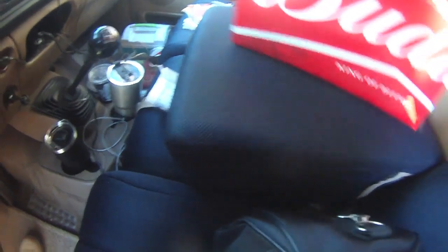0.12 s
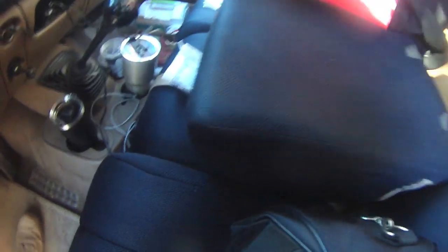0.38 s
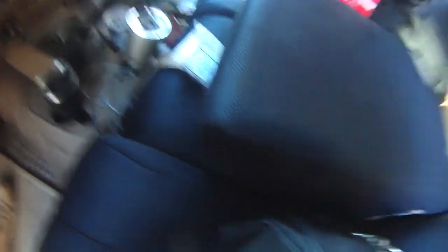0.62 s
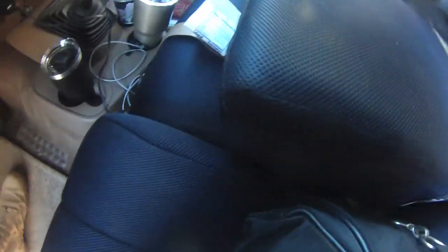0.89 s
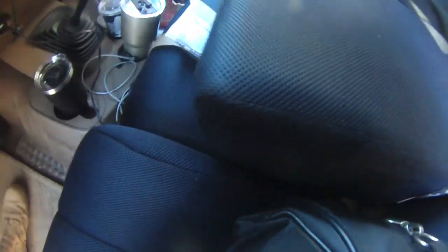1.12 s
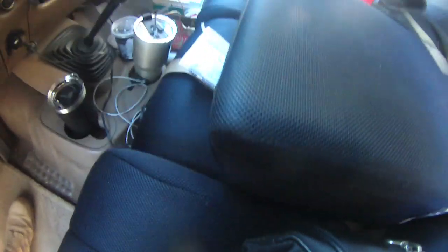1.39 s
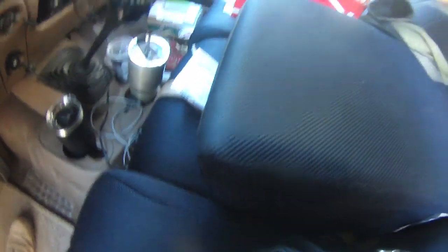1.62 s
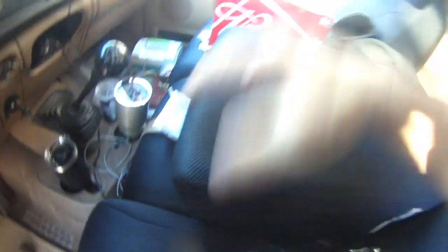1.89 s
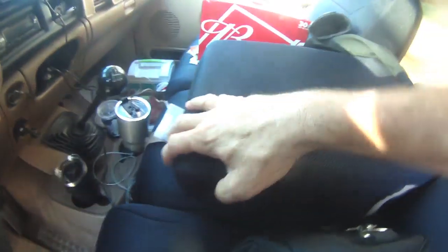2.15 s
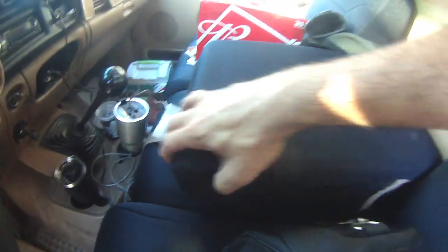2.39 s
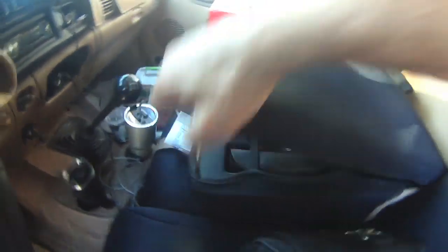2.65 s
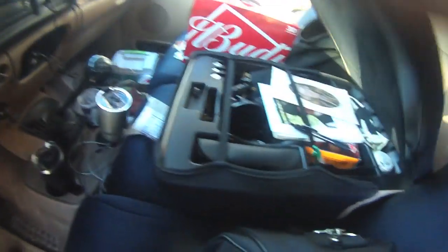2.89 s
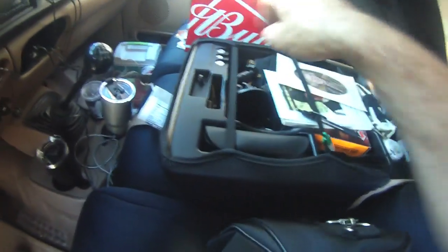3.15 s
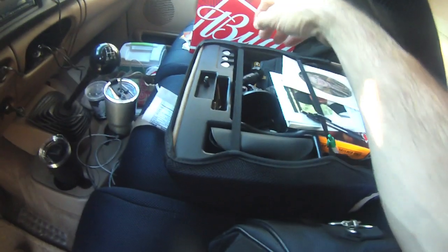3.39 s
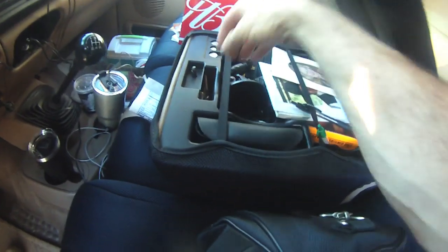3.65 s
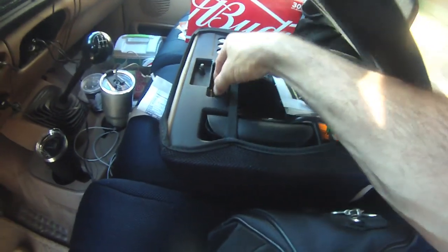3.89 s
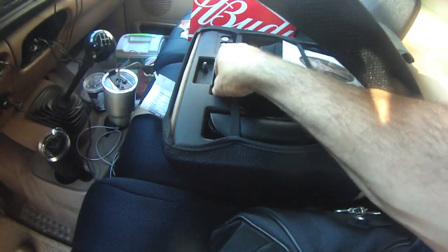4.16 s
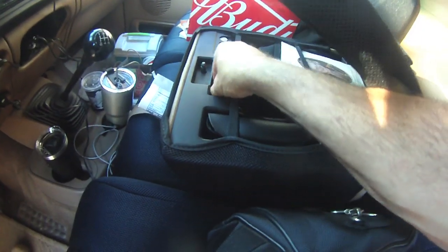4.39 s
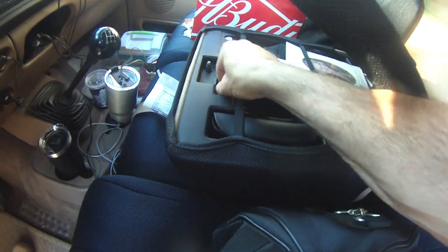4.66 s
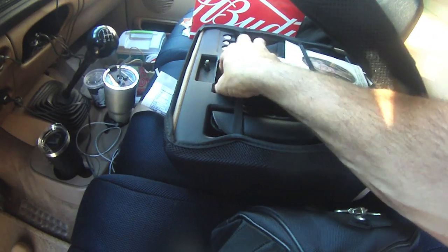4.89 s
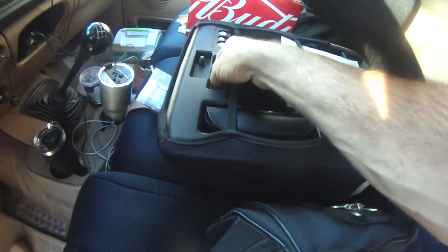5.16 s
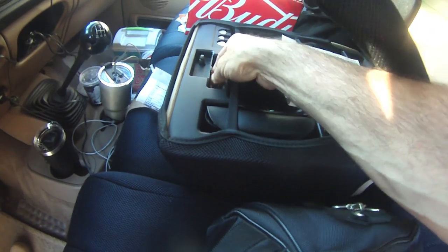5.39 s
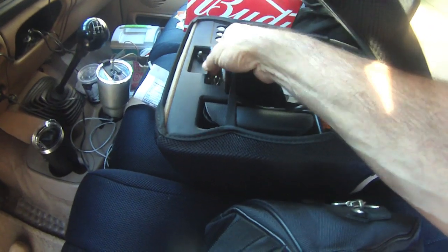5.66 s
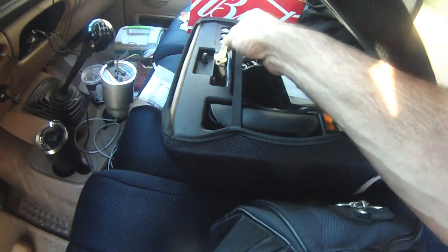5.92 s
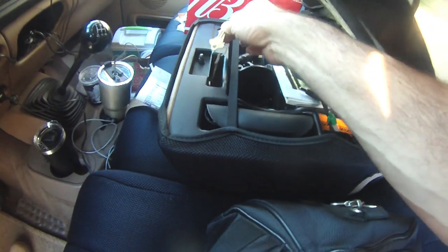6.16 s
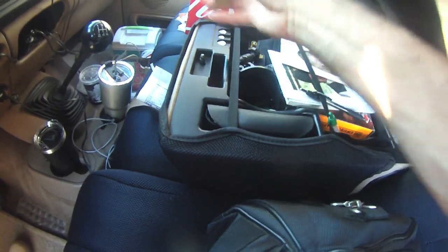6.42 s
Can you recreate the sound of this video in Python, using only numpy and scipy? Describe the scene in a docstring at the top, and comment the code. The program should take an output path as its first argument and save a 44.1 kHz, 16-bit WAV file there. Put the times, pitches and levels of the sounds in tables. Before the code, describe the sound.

A cardboard carton rubs and thuds, a console latch knocks, its hinge creaks, then coins and keys clack and clink in a hard plastic tray.

```python
"""A carton rubs and thuds, a latch knocks, a hinge creaks, and small metal clacks, scrapes and rings in a tray.
Inside a parked truck cab the carton is slid off the armrest, a hand unlatches the console lid and
fingers dig metal pieces out of hard plastic. Rubbing is dense coloured grains, blows and hinge slips
drive damped modes, and the metal pieces are decaying sines. Shifting clothes, low shaking and a
steady hush lie around it; one close microphone hears it all in a dead, padded space."""
import sys
import numpy as np
from scipy import signal
from scipy.io import wavfile
from scipy.ndimage import uniform_filter1d

SR = 44100
rng = np.random.default_rng(int(sys.argv[2]) if len(sys.argv) > 2 else 0)


def to_linear_factor(level_db):
    """Convert decibel levels (scalar or array-like) to linear amplitude factors."""
    exponent = np.asarray(level_db, float) / 20
    return 10 ** exponent


def digitize_waveform(pressure):
    """Quantize a signal to 16-bit integers and store it at the path in sys.argv[1].

    Rows of a 2-D input are taken as channels; values are limited to [-1, 1].
    """
    field = np.atleast_2d(pressure).T
    bounded = np.clip(field, -1, 1)
    quanta = np.round(bounded * 32767).astype(np.int16)
    wavfile.write(sys.argv[1], SR, quanta)


N = 288220  # length in samples

# Steady hush. Each row: frequency in Hz, relative level in dB.
HUSH_SPECTRUM = [(15, -45), (25, -5), (289, 5.5), (2490, -3), (2850, -2), (3630, -6.5), (5280, -8.5),
                 (5730, -7), (7300, -8.5), (13200, -10.5), (15500, -11)]
# The carton dragged over the seat. Each row: time in seconds, drag and hiss in relative dB.
CARTON_STROKES = [(0.0, -54, -46.5), (0.03, -50, -46), (0.286, -50, -43), (0.344, -40.5, -42.5),
                  (0.495, -54, -51.5), (0.52, -30.5, -39.5), (0.678, -51.5, -58), (0.79, -44.5, -46),
                  (0.86, -29.5, -43), (0.9, -31, -50), (1.06, -43.5, -41.5), (1.22, -47, -54),
                  (1.44, -52, -54), (1.5, -43, -41.5), (1.54, -44.5, -45.5), (1.604, -38, -39),
                  (1.7, -66, -70)]
# Clothes shifting on the seat. Each row: time in seconds, drag and hiss in relative dB.
CLOTH_STROKES = [(1.68, -61.5, -63), (2.37, -59.5, -60.5), (2.78, -58.5, -59), (3.03, -40.5, -55.5),
                 (3.07, -73, -77), (3.11, -47, -51.5), (3.35, -49.5, -58.5), (3.58, -91, -67.5),
                 (3.97, -49, -64), (4.51, -65, -70.5), (5.1, -51, -60), (5.65, -65.5, -63.5),
                 (6.05, -73, -80), (6.53, -54, -70)]
# Dull body of the rubbing. Each row: frequency in Hz, relative level in dB.
DRAG_SPECTRUM = [(18, -71), (30, -48), (112, -8), (243, -4.5), (377, -1.5), (490, -4.5), (802, -6),
                 (876, -6.5), (2000, -22), (2600, -28), (4400, -120)]
# Hiss of the rubbing. Each row: frequency in Hz, relative level in dB.
HISS_SPECTRUM = [(590, -22.5), (1000, -1), (1470, -1.5), (1610, 2.5), (2020, -9), (2710, -4), (3890, -9),
                 (6200, -10), (7350, -19.5), (8810, -21), (15000, -41.5)]
# Colour drifting as the carton turns. Each row: time in seconds, hollow of the carton in Hz,
# whine of the weave in Hz, treble gain of the hiss in dB.
CARTON_COLOUR = [(0.0, 430, 2370, 6), (0.4, 427, 2050, 1), (0.55, 465, 2600, -1), (0.8, 594, 1960, -4),
                 (0.89, 481, 2450, -3.5), (1.06, 550, 2500, -11.5), (1.22, 640, 1390, -4.5),
                 (1.48, 475, 2540, -8), (1.62, 500, 2150, -3)]
# The seat jolts the microphone. Each row: time in seconds, peak in relative dB.
SEAT_JOLTS = [(0.02, -56.5), (0.56, -49), (1.14, -63), (1.58, -64), (2.3, -57), (3.17, -61.5), (5.102, -78)]
# Carton, latch and lid knocking. Each row: time in seconds, then thud, crack and
# thump of the whole lid in relative dB.
KNOCK_BLOWS = [(0.033, -20.5, -43, -50), (0.044, -18.5, -36, -35), (0.236, -35.5, -37.5, -41),
               (0.255, -45, -54, -34), (0.33, -26, -49, -31.5), (0.367, -32, -44, -43),
               (0.399, -33, -58, -32.5), (0.51, -22, -33, -27.5), (0.525, -37, -38.5, -37),
               (0.547, -26, -35, -26), (0.558, -23, -39, -22), (0.697, -33, -45, -42),
               (0.874, -29, -41.5, -41), (1.245, -41, -50.5, -52), (1.313, -40.5, -53, -50),
               (1.557, -38, -43, -35), (1.974, -43.5, -70, -55), (2.231, -32.5, -46.5, -45),
               (2.256, -42, -56, -44), (2.293, -13.5, -27, -14.5), (2.432, -43, -59, -63.5),
               (2.467, -35, -45.5, -41), (2.504, -41, -51, -44), (2.521, -33.5, -54, -47),
               (2.569, -34, -48.5, -46), (2.658, -41, -46.5, -46), (2.694, -24.5, -34.5, -36),
               (2.78, -33, -45.5, -55), (2.804, -33, -44.5, -43), (2.846, -41, -43, -62)]
# Modes of the padded console. Each row: frequency in Hz, width in Hz, relative level in dB.
CONSOLE_MODES = [(370, 76, -3), (481, 81, -2), (768, 164, -4.5), (1260, 270, -4), (1728, 230, -13)]
# The padded lid as a whole. Each row: frequency in Hz, width in Hz, relative level in dB.
LID_MODES = [(180, 120, 0), (269, 195, -1.5)]
# Short crack at the edge of a knock. Each row: frequency in Hz, relative level in dB.
CRACK_SPECTRUM = [(1200, -24), (2000, -14.5), (2750, -7), (3500, -15), (4000, -19.5), (5700, -22.5),
                  (8500, -32.5), (12000, -43.5), (15500, -68)]
# Swings of the hinge. Each row: start in seconds, length in seconds, slip at start and at end
# in relative dB, nominal slips per second at start and at end.
HINGE_SWINGS = [(2.913, 0.024, -20, -25, 204, 192), (2.938, 0.096, -21.5, -14, 230, 124),
                (3.094, 0.056, -16, -18, 253, 197), (3.175, .014, -14, -49, 150, 195),
                (3.206, 0.07, -15, -16.5, 133, 100), (3.309, .09, -17, -20.5, 69, 60),
                (3.47, 0.074, -20.5, -26, 100, 46), (3.673, 0.049, -18.5, -25, 125, 90),
                (3.723, 0.15, -13, -23.5, 61, 64), (3.895, 0.093, -19, -42, 63, 62),
                (5.984, 0.061, -20.5, -22, 17, 21), (6.11, .25, -27, -24, 28, 58),
                (6.358, .175, -21.5, -19, 28, 62)]
# Lower modes of the creak. Each row: frequency in Hz, width in Hz, relative level in dB.
HINGE_LOW_MODES = [(260, 88, -39), (400, 98, 11.5), (617, 50, 17), (760, 230, 11)]
# Higher modes of the creak. Each row: frequency in Hz, width in Hz, relative level in dB.
HINGE_HIGH_MODES = [(1497, 180, 0), (2630, 210, -5), (3100, 220, -9.5), (5000, 1500, -22)]
# Metal dragged over the tray. Each row: start in seconds, length in seconds, peak in relative dB,
# place of the peak from 0 to 1 (kept off the very ends), grit against the peak in relative dB.
TRAY_STROKES = [(3.87, 0.077, -42.5, 0.2, -23.5), (4.011, 0.13, -42.5, 1, -19),
                (4.17, 0.098, -33, 0.51, -12), (4.28, .06, -61, 0.1, -18), (4.449, 0.16, -52.5, 0.09, -11),
                (4.739, 0.11, -36, 0.17, -14), (4.856, 0.13, -37.5, 0.07, -15),
                (4.964, 0.17, -49, 0.33, -16), (5.076, 0.2, -32.5, 0.78, -13),
                (5.269, 0.066, -32, 0.14, -15.5), (5.347, 0.068, -38.5, 0.58, -20),
                (5.413, 0.051, -39, 0.54, -19), (5.525, 0.15, -37, 0.37, -22),
                (5.691, 0.079, -37, 0.23, -20.5), (5.784, .22, -31, 0, -17),
                (6.166, 0.082, -48.5, 0.25, -15), (6.212, .11, -44.5, 0, -17)]
# Metal striking the tray. Each row: time in seconds, then floor modes, tick and wall modes in relative dB.
TRAY_CLACKS = [(4.0236, -22, -50, -33.5), (4.06, -35, -45, -38), (4.0909, -17.5, -29.5, -23.5),
               (4.1375, -21, -44.5, -34.5), (4.1857, -19.5, -43, -25), (4.1967, -21, -37, -24),
               (4.2176, -23, -39.5, -26), (4.2869, -20.5, -40, -31.5), (4.4737, -26.5, -44, -31.5),
               (4.5386, -37, -48, -38.5), (4.6, -43, -65, -49.5), (4.7209, -28, -79, -47),
               (4.742, -23.5, -45, -32), (4.759, -19, -37.5, -27), (4.775, -18.5, -49, -28),
               (4.809, -21.5, -60, -51), (4.8667, -22, -40, -30.5), (4.8923, -22.5, -41, -40),
               (4.9242, -14, -30, -27), (4.972, -40, -49, -44), (5.047, -47, -42.5, -45),
               (5.1182, -19.5, -36.5, -29), (5.1651, -36, -41, -30), (5.1795, -39, -42, -23.5),
               (5.2087, -24, -50, -25), (5.233, -24, -23.5, -16), (5.2813, -8, -45, -18),
               (5.301, -13, -59, -36), (5.3717, -42, -47, -34), (5.387, -32, -39, -35),
               (5.4437, -31.5, -42, -32.5), (5.554, -46, -45.5, -33.5), (5.5905, -23, -39, -24.5),
               (5.6298, -27.5, -39, -33), (5.7123, -20, -36.5, -31), (5.7964, -47, -43, -37),
               (5.8168, -21, -53, -23), (5.8708, -20.5, -34.5, -33), (5.93, -48, -56, -26),
               (5.953, -23.5, -58, -33), (6.17, -21, -39, -25.5), (6.1963, -28.5, -52, -34),
               (6.242, -25, -43, -17.5), (6.263, -28, -45, -31.5), (6.3025, -28.5, -43, -29.5)]
# Modes of the tray's floor. Each row: frequency in Hz, width in Hz, relative level in dB.
TRAY_FLOOR_MODES = [(380, 139, -13.5), (1130, 388, -5), (1377, 101, 5), (1710, 205, -10)]
# Modes of the tray's wall. Each row: frequency in Hz, width in Hz, relative level in dB.
TRAY_WALL_MODES = [(2256, 88, 2), (2448, 100, 1.5), (2930, 850, -5), (3204, 146, 2.5), (3565, 210, -5)]
# Grit and ticks of hard edges. Each row: frequency in Hz, relative level in dB.
GRIT_SPECTRUM = [(3000, -34), (4100, 0), (4800, 9), (6500, -2.5), (8100, -2.5), (9500, -8.5),
                 (11000, -20.5), (13000, -25), (15500, -25)]
# Thin modes of each loose metal piece, by name. Each row: nominal frequency in Hz,
# relative level in dB, time to fall 60 dB in seconds.
PIECE_MODES = {"coin": [(7980, 1, 0.055), (12000, -19, 0.063)], "key": [(7210, 1.5, 0.11),
               (9050, -11, 0.061)], "ring": [(5710, -1.5, 0.5)], "clip": [(14230, 2, 0.27),
               (13150, -8, 0.083), (9240, 5.5, 0.1)]}
# Blows that set a piece ringing. Each row: time in seconds, relative level in dB, name of the piece.
PIECE_BLOWS = [(4.19, -44, "coin"), (4.21, -44, "coin"), (4.235, -46, "coin"), (4.744, -41.5, "coin"),
               (4.772, -38.5, "coin"), (4.895, -43, "coin"), (4.925, -37, "coin"), (5.133, -39.5, "coin"),
               (5.145, -47, "key"), (5.233, -32, "coin"), (5.283, -44, "key"), (5.385, -44.5, "key"),
               (5.555, -67, "clip"), (5.632, -50, "coin"), (5.83, -41.5, "key"), (5.908, -44, "key"),
               (5.908, -38, "coin"), (5.972, -50, "coin"), (5.97, -67, "clip"), (6.08, -64, "ring"),
               (6.138, -52.5, "coin"), (6.172, -51, "clip"), (6.172, -50, "key"), (6.172, -53, "ring"),
               (6.243, -48, "key"), (6.315, -51.5, "ring"), (6.42, -52.5, "ring"), (6.463, -44.5, "coin")]
# Microphone in the boxy cab. Each row: frequency in Hz, relative gain in dB.
MIC_RESPONSE = [(40, -36), (110, -10.5), (170, 1.5), (300, 1.5), (415, 2.5), (560, 0), (20000, 1.5)]


def evened(x):
    """Scales a signal to an rms of 1."""
    return x / np.sqrt(np.mean(x ** 2) + 1e-20)


def add(mix, start_s, sound):
    """Lays a sound into the mix, cut off at the mix's end."""
    part = mix[round(start_s * SR):][:len(sound)]
    part += sound[:len(part)]


def coloured(points):
    """Causal, minimum-phase impulse response of unit energy with the given spectrum."""
    hz, db = np.transpose(points)
    bins_hz = abs(np.fft.fftfreq(4096, 1 / SR))
    gain_db = np.interp(np.log(bins_hz + 1), np.log(hz + 1), db)
    log_gain = np.log(to_linear_factor(gain_db) + 1e-5)
    taps = np.fft.ifft(np.exp(np.conj(signal.hilbert(log_gain)))).real[:2048]
    return taps / np.linalg.norm(taps)


def ringing(modes, contact_s):
    """Impulse response of unit energy: a damped sine per mode, driven by a short soft push."""
    t = np.arange(4096) / SR
    taps = np.zeros(len(t))
    for k, (hz, width_hz, db) in enumerate(modes):
        decay = np.exp(-np.pi * width_hz * t)
        taps += (-1) ** k * to_linear_factor(db) * width_hz * decay * np.sin(2 * np.pi * hz * t)
    push = t[:200] * np.exp(-t[:200] / contact_s)
    taps = np.convolve(taps, push)
    return taps / np.linalg.norm(taps)


def through(x, taps):
    """Plays a signal through an impulse response, kept to the scene's length."""
    return signal.oaconvolve(x, taps)[:N]


def resonate(x, hz, width_hz):
    """Moving resonance: shifts the curve hz down to zero, smooths, and shifts back."""
    turn = np.exp(2j * np.pi * np.cumsum(hz) / SR)
    r = np.exp(-np.pi * width_hz / SR)
    return 2 * (turn * signal.lfilter([1 - r], [1, -r], x / turn)).real


def grains(per_s, spread_db, clump_db):
    """Tiny stick-slip jolts of uneven size and level that come at random instants; rms 1."""
    size = to_linear_factor(spread_db * np.minimum(rng.exponential(1, N), 5)) * rng.choice([-1, 1], N)
    clumps = evened(uniform_filter1d(rng.standard_normal(N), size=300))
    struck = rng.random(N) < per_s / SR
    return evened(size * struck * to_linear_factor(clump_db * clumps))


def stroke(rows, column):
    """Gain curve of one column, joined straight in dB and near silent outside the rows."""
    table = np.transpose(rows)
    return to_linear_factor(np.interp(np.arange(N) / SR, table[0], table[column], -200, -200))


def blows(times, levels_db, t60_s, rise_s, push):
    """Each blow: a push with a chatter of the parts on it, building fast and dying away."""
    out, t = np.zeros(N), np.arange(3000) / SR
    chatter = rng.standard_normal((len(times), len(t)))
    pushed = chatter + push * np.exp(-t / 0.00036)
    for start_s, db, contact in zip(times, levels_db, pushed):
        add(out, start_s, to_linear_factor(db - 60 * t / t60_s) * (1 - np.exp(-t / rise_s)) * contact)
    return out


def hush():
    """Steady coloured noise with a faint hiss that has opposite sign in the two channels."""
    common, apart = (through(rng.standard_normal(N), coloured(HUSH_SPECTRUM)) for _ in range(2))
    apart = apart + 3 * np.diff(apart, prepend=0)  # tilted towards the treble
    return to_linear_factor(-64.5) * common, to_linear_factor(-82) * evened(apart)


def rubbing():
    """Dense grains of carton and cloth: a dull drag, the carton's hollow, the weave's hiss and whine."""
    jolts, fibres = grains(3000, 1.8, 2.5), grains(9000, 3.1, 1.1)
    carton_drag, carton_hiss = stroke(CARTON_STROKES, column=1), stroke(CARTON_STROKES, column=2)
    drag = (to_linear_factor(-5) * carton_drag + stroke(CLOTH_STROKES, column=1)) * jolts
    hiss = (to_linear_factor(-1.5) * carton_hiss + stroke(CLOTH_STROKES, column=2)) * fibres

    s, *curves = np.transpose(CARTON_COLOUR)
    hollow_hz, whine_hz, treble_db = (np.interp(np.arange(N) / SR, s, curve) for curve in curves)
    hollow = evened(resonate(resonate(jolts, hollow_hz, 210), hollow_hz, 210))
    whine = evened(resonate(resonate(fibres, whine_hz, 830), whine_hz, 830))
    hollow = to_linear_factor(-7) * carton_drag * hollow
    whine = to_linear_factor(-12) * carton_hiss * whine

    # the treble gain acts on what lies above the split
    split_hz = 3680
    hiss = through(hiss, coloured(HISS_SPECTRUM))
    dull = signal.oaconvolve(hiss, signal.firwin(63, split_hz, fs=SR), "same")
    bright = to_linear_factor(treble_db) * (hiss - dull)
    return through(drag, coloured(DRAG_SPECTRUM)) + hollow + whine + dull + bright


def rumble():
    """Low shaking, swelling at each jolt, that reaches the microphone through its mount."""
    rise_db_per_s, fall_db_per_s, rest_db = 137, 84, -89
    band = signal.butter(2, [30, 90], "band", fs=SR, output="sos")  # Hz
    shake = signal.sosfilt(band, rng.standard_normal(N))
    t = np.arange(N) / SR
    gain = to_linear_factor(rest_db)
    for s, db in SEAT_JOLTS:
        gain = gain + to_linear_factor(db - np.maximum(rise_db_per_s * (s - t), fall_db_per_s * (t - s)))
    return gain * evened(shake)


def knocks():
    """A contact, soft or hard, drives the console's modes; its edge gives a short crack."""
    s, thud_db, crack_db, thump_db = np.transpose(KNOCK_BLOWS)
    # crack against thud tells how hard the contact is
    soft_below_db, hard_above_db = -19.5, -10
    hard = (crack_db - thud_db - soft_below_db) / (hard_above_db - soft_below_db)
    hard = np.clip(hard, 0.01, 0.99)
    thud = np.zeros(N)
    for share, contact_s in ((hard, 0.00006), (1 - hard, 0.0003)):
        contact = blows(s, thud_db + 10 * np.log10(share), t60_s=0.031, rise_s=0.00047, push=0.94)
        thud += through(contact, ringing(CONSOLE_MODES, contact_s))
    thump = blows(s, thump_db, t60_s=0.016, rise_s=0.0014, push=3.35)
    thump = through(thump, ringing(LID_MODES, 0.00018))
    crack = blows(s, crack_db, t60_s=0.024, rise_s=0.00049, push=0)
    crack = through(crack, coloured(CRACK_SPECTRUM))
    return thud + thump + to_linear_factor(6.5) * crack


def hinge():
    """Each slip is one jolt into the lid's modes; fast slips fuse to a buzz."""
    uneven_gaps, uneven_db = 0.08, 2.4
    sharp_db, sharp_db_per_octave = -10, 3  # treble of a slip at 50 a second; faster slips are sharper
    low, high = np.zeros(N), np.zeros(N)
    wobble, size, edge = rng.standard_normal((3, N))
    wobble = evened(uniform_filter1d(wobble, size=300))
    for start, length, db0, db1, per_s0, per_s1 in HINGE_SWINGS:
        u = np.arange(0, length, 1 / SR) / length
        here = slice(round(start * SR), round(start * SR) + len(u))
        per_s = per_s0 * (per_s1 / per_s0) ** u
        turns = np.cumsum(per_s * np.exp(uneven_gaps * wobble[here])) / SR
        slipped = np.diff(np.floor(turns), prepend=-1)  # one jolt at each whole turn
        slips = slipped * to_linear_factor(db0 + (db1 - db0) * u + uneven_db * size[here])
        slips[0] *= to_linear_factor(1.5)  # breaking loose
        treble_db = sharp_db + sharp_db_per_octave * np.log2(per_s / 50) + 2 * uneven_db * edge[here]
        add(low, start, slips)
        add(high, start, slips * to_linear_factor(treble_db))
    creak = through(low, ringing(HINGE_LOW_MODES, 0.00015)) + through(high, ringing(HINGE_HIGH_MODES, 0.00004))
    # the slip is not quite clean: a faint noise trails it
    shake = rng.standard_normal(400) * to_linear_factor(-60 * np.arange(400) / SR / 0.0094) * 0.018
    shake[0] = 1
    return through(creak, shake)


def dragging():
    """Gains of body and grit of the hand's strokes: each swells to its peak and sinks again."""
    ends_db, bend = -23.5, 1.78  # quiet at both ends, round on top
    body, grit = np.zeros(N), np.zeros(N)
    for start, length, db, peak, grit_db in TRAY_STROKES:
        u = np.arange(0, length, 1 / SR) / length
        peak = np.clip(peak, 0.05, 0.95)
        off_peak = np.maximum((peak - u) / peak, (u - peak) / (1 - peak))
        swell = to_linear_factor(db + ends_db * off_peak ** bend)
        add(body, start, swell)
        add(grit, start, to_linear_factor(grit_db) * swell)
    return body, grit


def tray():
    """Clacks and dragging both drive the tray's modes; their hard edges add ticks and grit."""
    body_gain, grit_gain = dragging()
    drag = body_gain * grains(1500, 3.4, 5)
    grit = grit_gain * grains(3300, 3.1, 5)
    s, floor_db, tick_db, wall_db = np.transpose(TRAY_CLACKS)
    floor = to_linear_factor(-1) * drag + to_linear_factor(-7) * blows(s, floor_db, t60_s=0.03, rise_s=0.00052, push=1.11)
    wall = to_linear_factor(-7.5) * drag + blows(s, wall_db, t60_s=0.016, rise_s=0.00061, push=0)
    edge = grit + to_linear_factor(0.5) * blows(s, tick_db, t60_s=0.029, rise_s=0.0007, push=0)
    floor = through(floor, ringing(TRAY_FLOOR_MODES, 0.00006))
    wall = through(wall, ringing(TRAY_WALL_MODES, 0.00003))
    return floor + wall + through(edge, coloured(GRIT_SPECTRUM))


def metal():
    """Thin high modes of the loose pieces that ring on after a blow."""
    out, t = np.zeros(N), np.arange(SR // 3) / SR
    rise = 1 - np.exp(-t / 0.00056)
    for (s, blow_db, piece), lie in zip(PIECE_BLOWS, rng.standard_normal(len(PIECE_BLOWS))):
        # each blow finds a coin lying a little differently
        detune = 1 + 0.014 * lie * (piece == "coin")
        for hz, db, t60_s in PIECE_MODES[piece]:
            tone = np.sin(2 * np.pi * hz * detune * t)
            add(out, s, to_linear_factor(blow_db + db - 60 * t / t60_s) * tone * rise)
    return out


def cab(x):
    """A very short dense tail off glass and plastic, as decaying noise."""
    t = np.arange(SR // 5) / SR
    noise = signal.lfilter([1], [1, -0.6], rng.standard_normal(len(t)))
    tail = noise * to_linear_factor(-60 * t / 0.039) * (t > 0.002)  # falls 60 dB in 39 ms, silent for the first 2 ms
    return through(x, tail / np.linalg.norm(tail))


def scene():
    """All sources reach one microphone over its steady hush."""
    near = knocks() + hinge() + tray() + metal()
    heard = through(near + to_linear_factor(-12) * cab(near) + rubbing(), coloured(MIC_RESPONSE))
    common, apart = hush()
    mono = heard + rumble() + common
    return np.array([mono + apart, mono - apart])


def roll_off(x):
    """The treble ends steeply here."""
    return signal.sosfilt(signal.butter(12, 15720, fs=SR, output="sos"), x)


def record(dry):
    """Band-limits the treble and returns the finished sound."""
    edge_hz = 15350
    limited = signal.oaconvolve(dry, signal.firwin(301, edge_hz, fs=SR)[None], "same")
    return roll_off(limited)


dry = scene()
out = record(dry)
digitize_waveform(out)
```